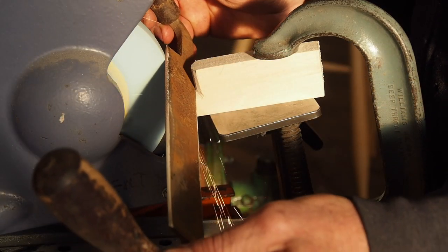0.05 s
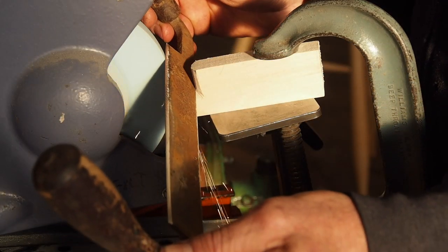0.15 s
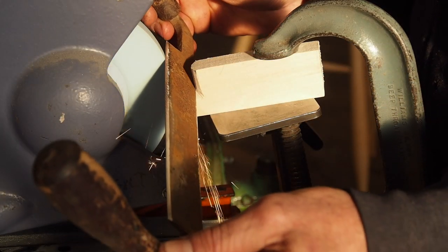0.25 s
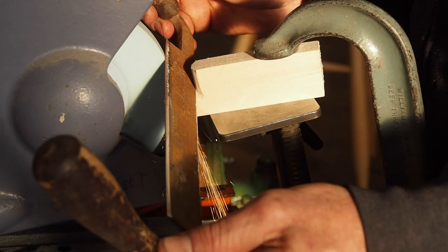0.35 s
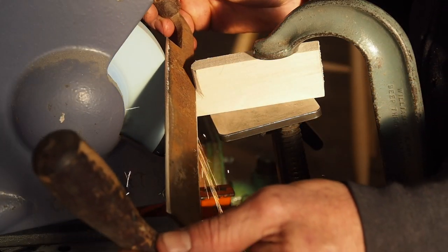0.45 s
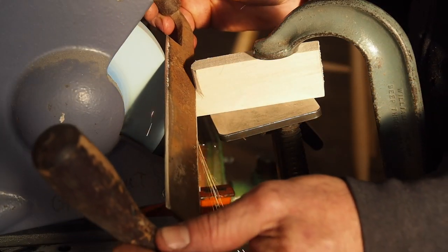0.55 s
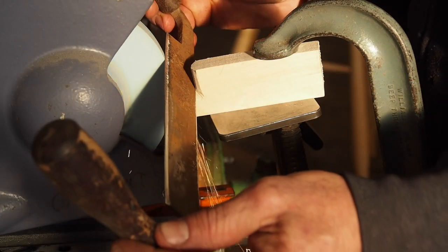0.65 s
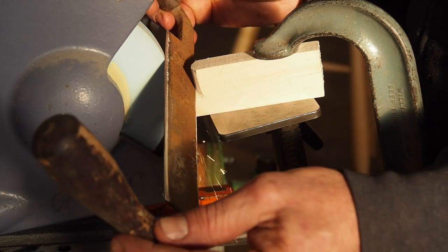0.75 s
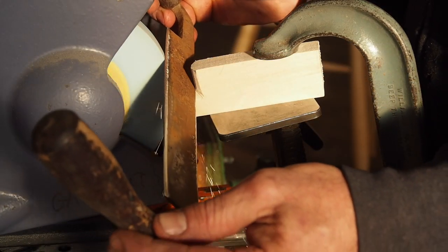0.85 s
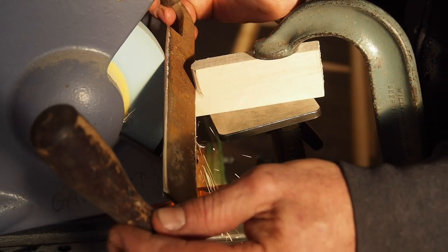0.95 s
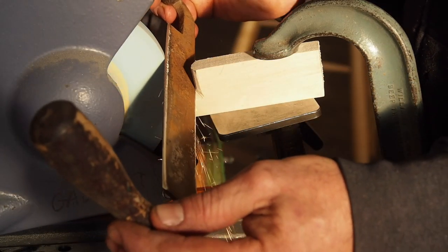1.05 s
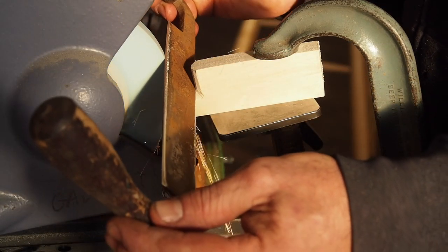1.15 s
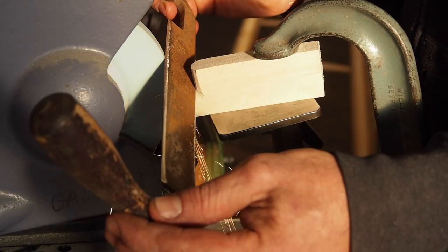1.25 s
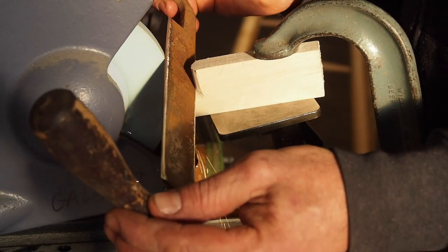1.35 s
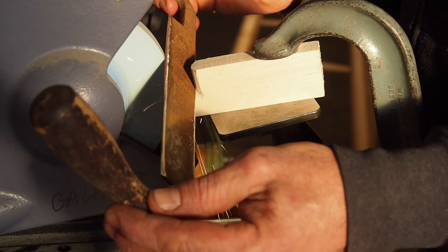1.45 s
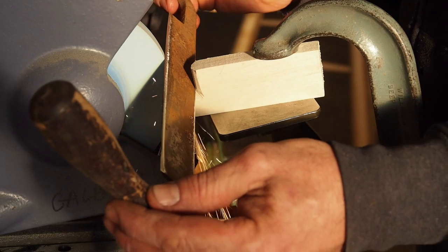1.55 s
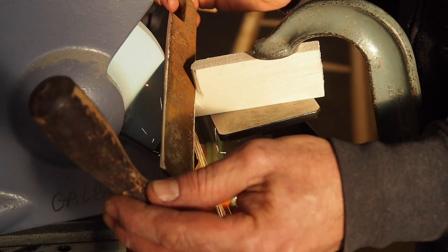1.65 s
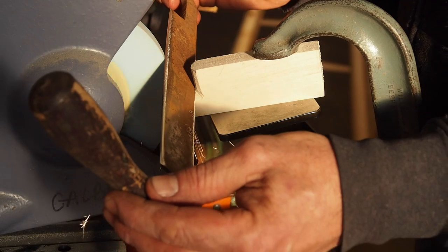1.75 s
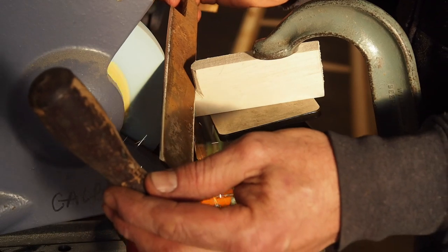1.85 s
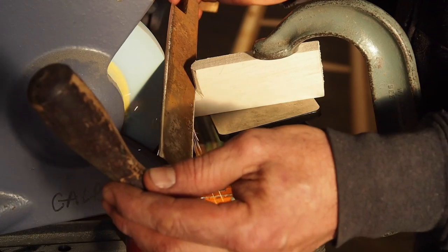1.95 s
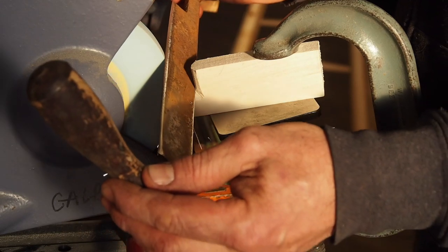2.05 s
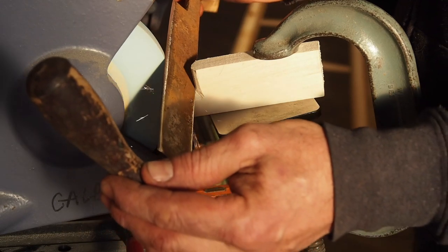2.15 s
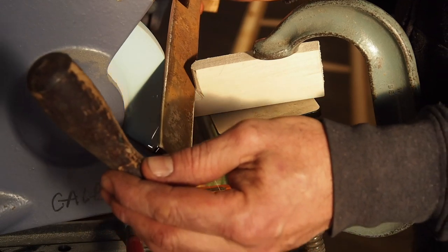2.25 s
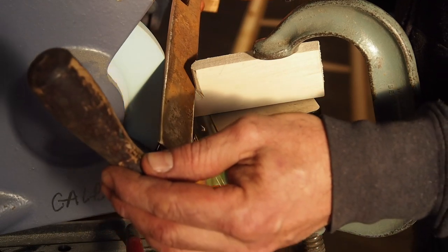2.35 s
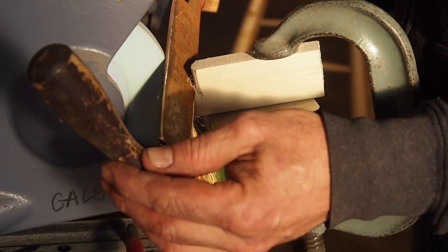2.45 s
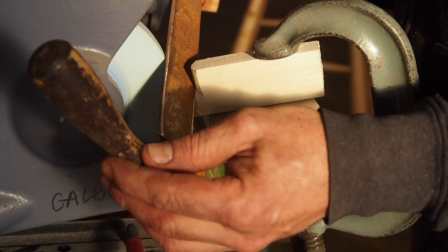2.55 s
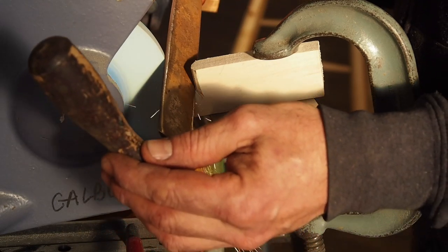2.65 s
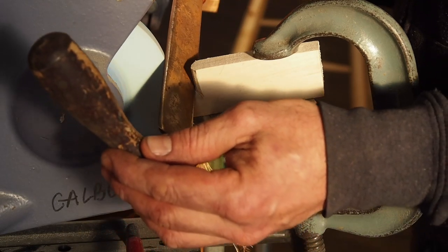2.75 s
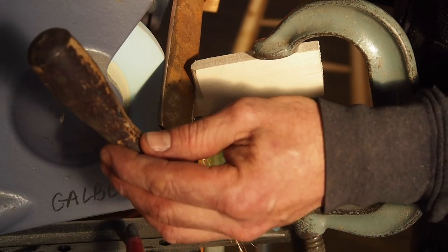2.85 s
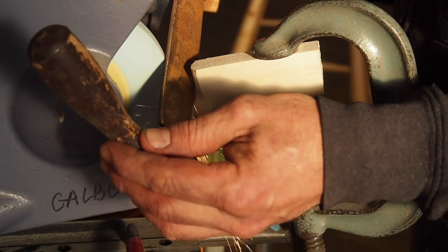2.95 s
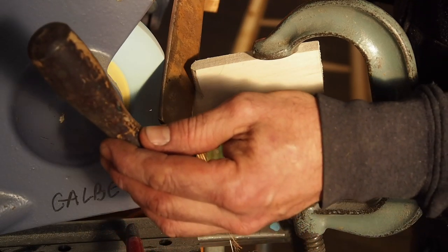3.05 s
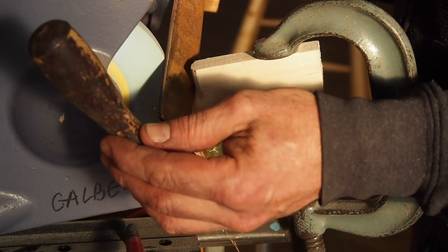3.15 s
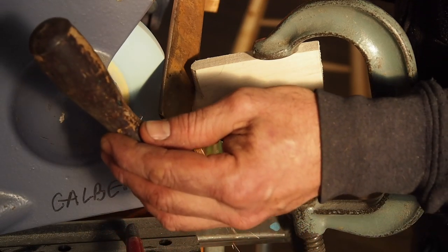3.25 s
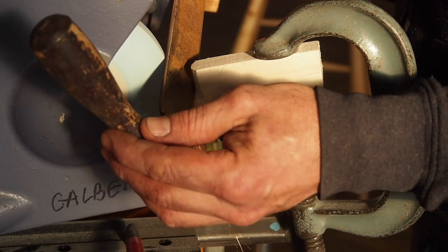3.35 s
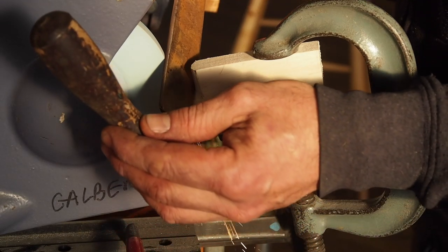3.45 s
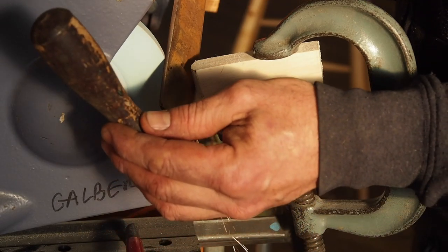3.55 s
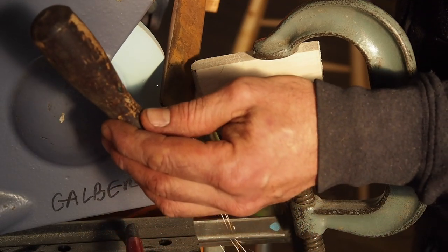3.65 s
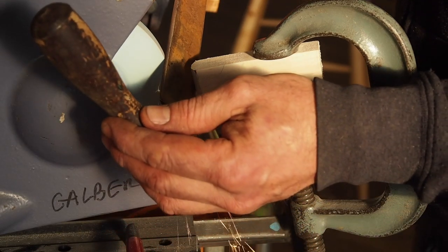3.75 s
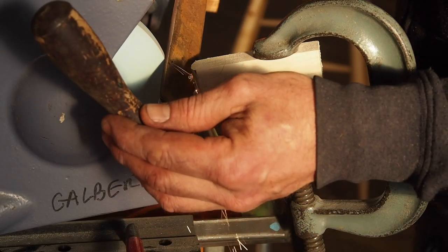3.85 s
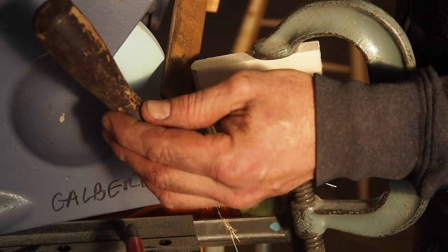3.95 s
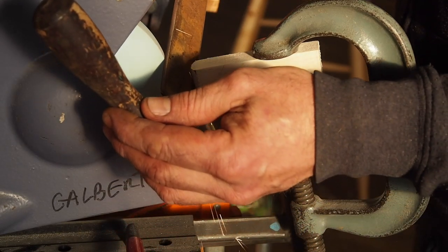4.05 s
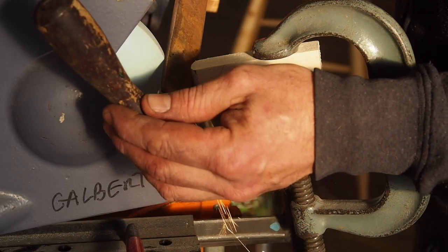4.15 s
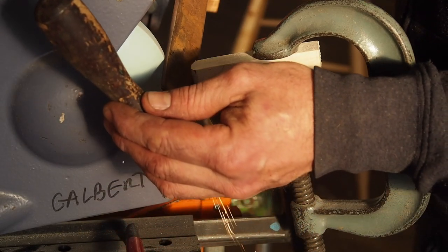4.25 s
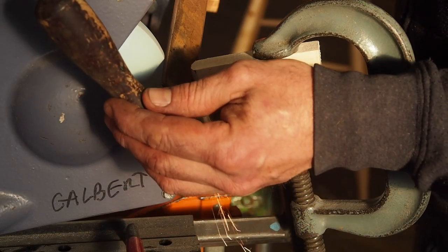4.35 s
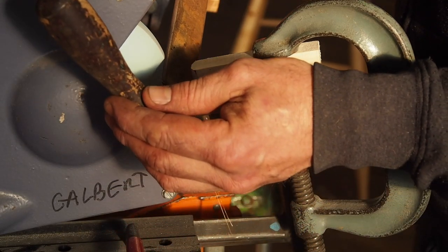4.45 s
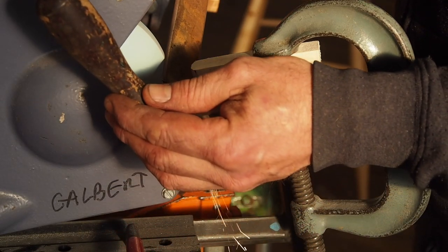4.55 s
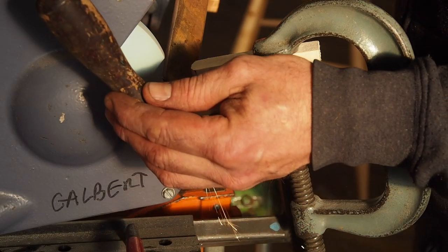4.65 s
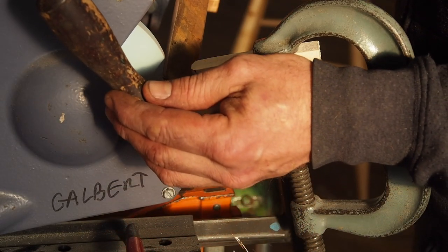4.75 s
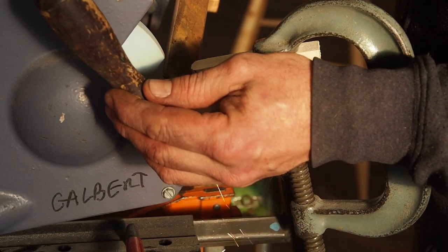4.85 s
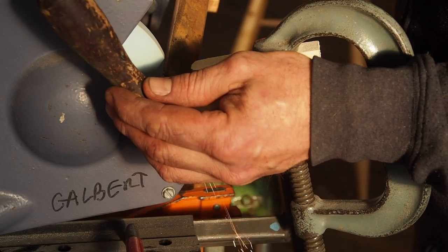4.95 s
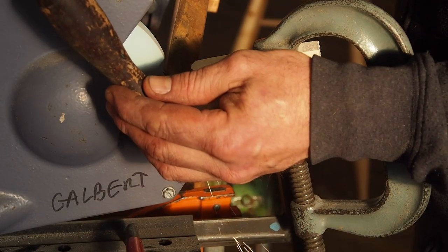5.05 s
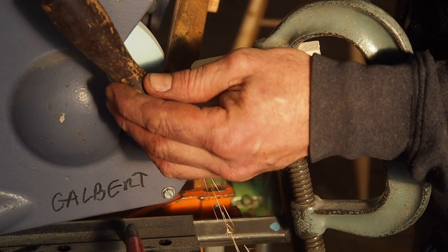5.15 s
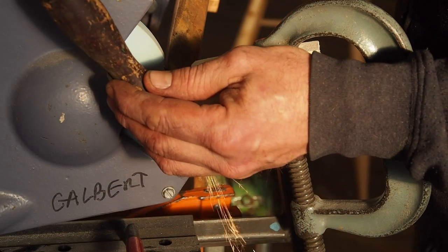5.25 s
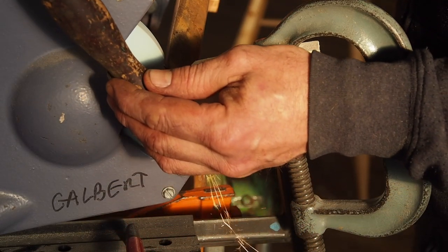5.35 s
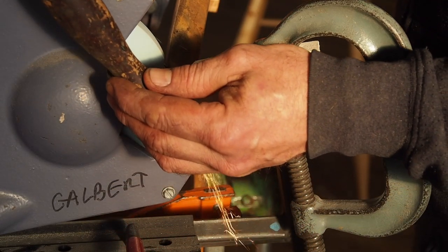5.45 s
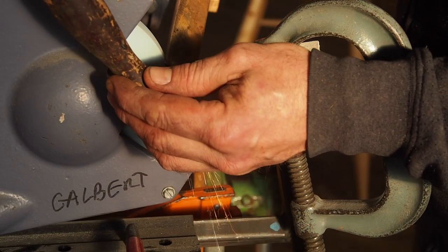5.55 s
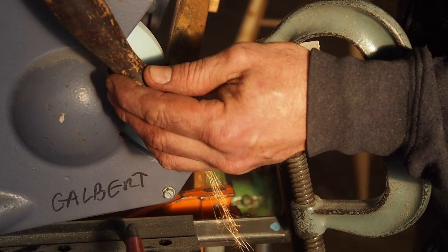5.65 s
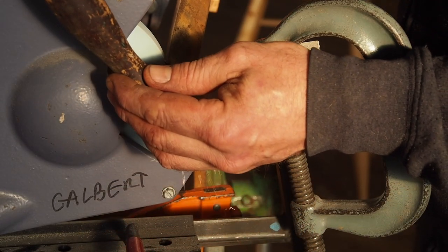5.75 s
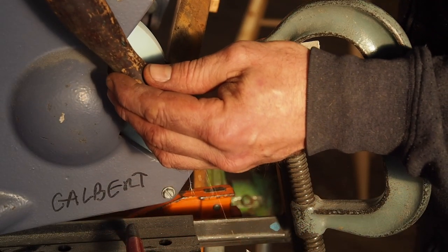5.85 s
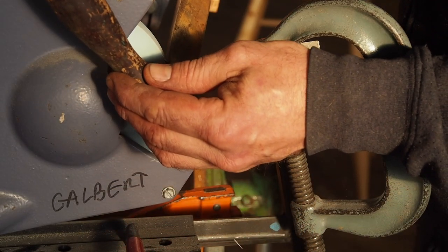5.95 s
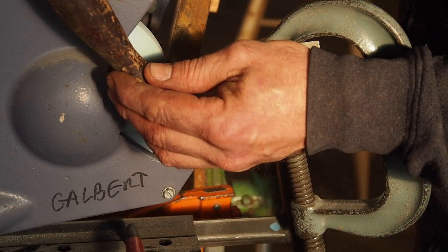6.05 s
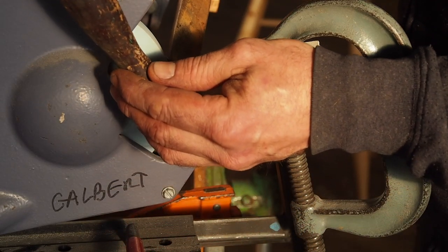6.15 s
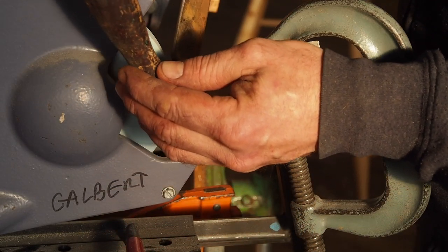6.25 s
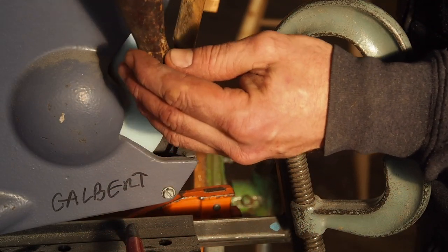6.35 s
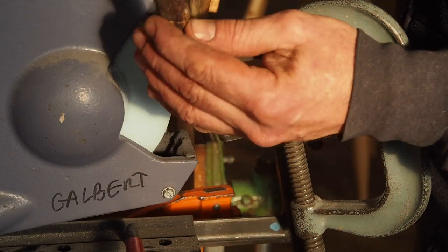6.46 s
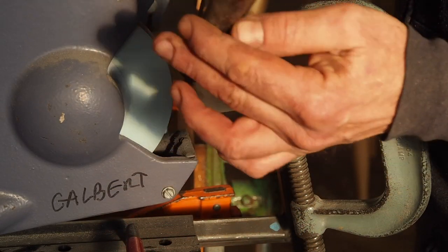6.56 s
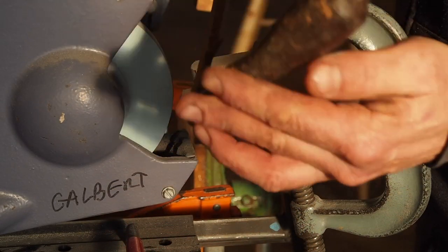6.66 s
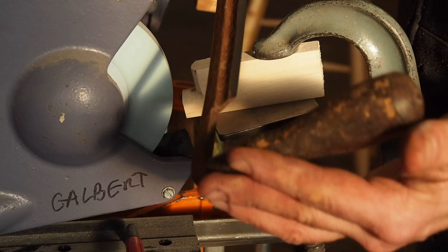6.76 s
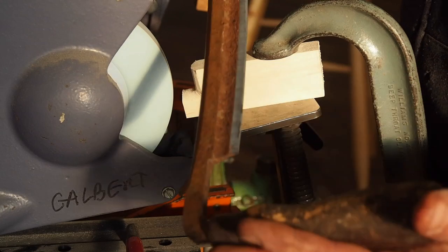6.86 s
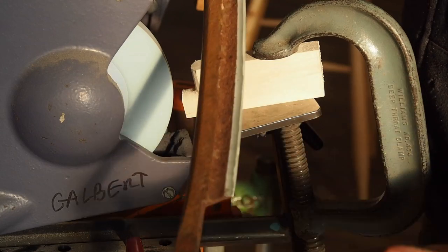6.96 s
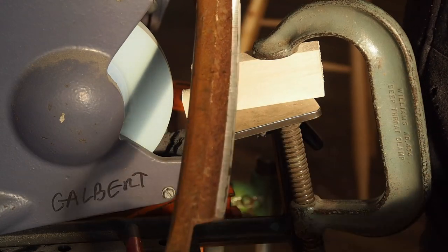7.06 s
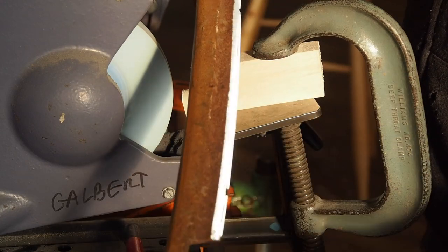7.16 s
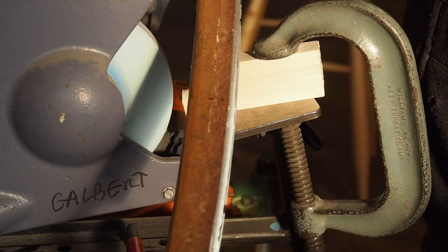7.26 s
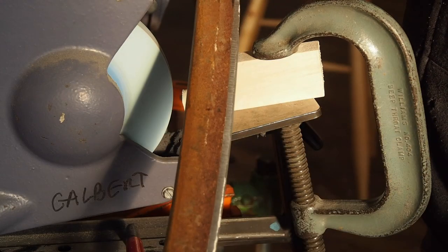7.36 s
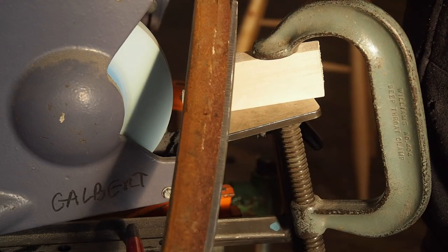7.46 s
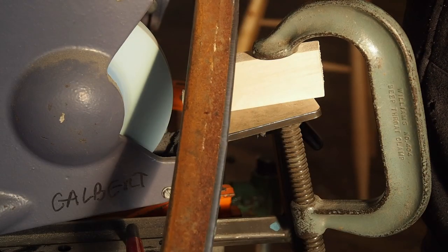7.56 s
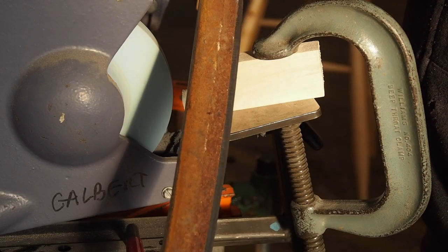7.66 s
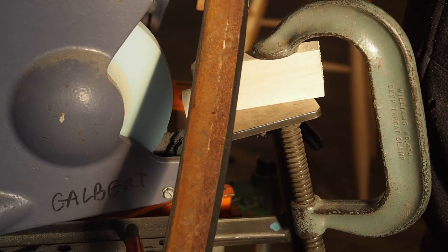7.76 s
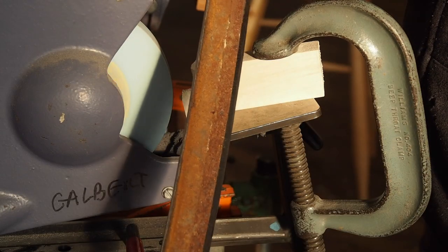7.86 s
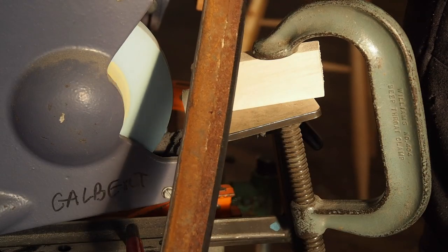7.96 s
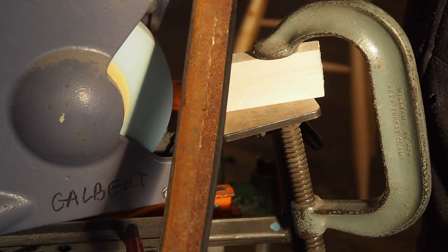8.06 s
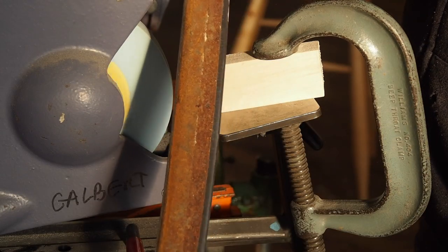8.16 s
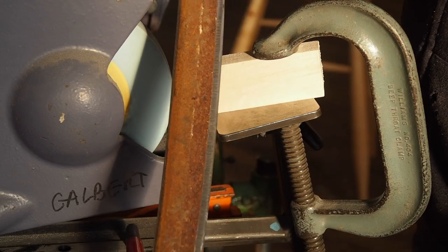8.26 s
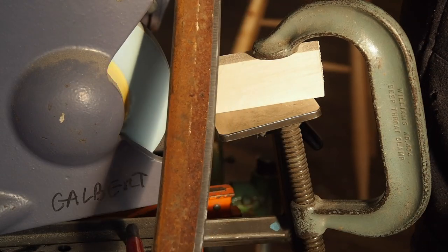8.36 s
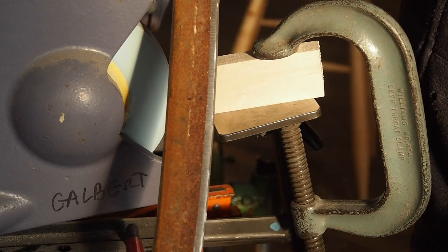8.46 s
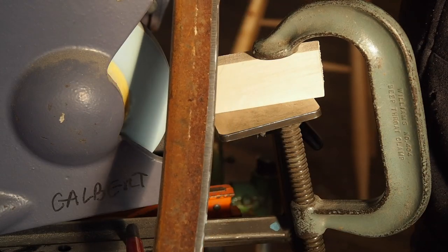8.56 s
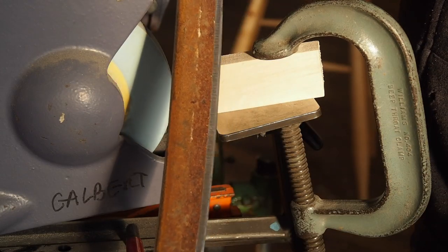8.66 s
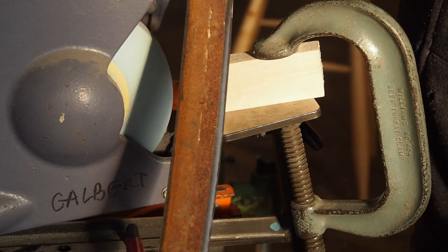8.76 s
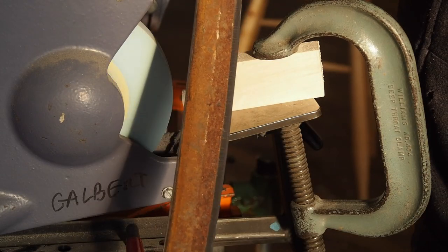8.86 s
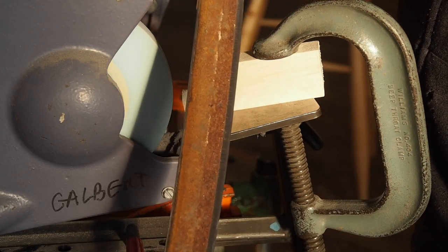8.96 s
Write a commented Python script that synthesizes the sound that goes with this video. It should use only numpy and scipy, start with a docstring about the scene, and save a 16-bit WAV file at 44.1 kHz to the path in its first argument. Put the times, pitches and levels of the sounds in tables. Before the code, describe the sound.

Continuous gritty grinding of steel on a bench grinder for six seconds, then loose metal guard rattles over the steady motor hum and wind.

```python
"""Steel blade on a bench grinder

A long steel blade is drawn along the grinding wheel, then lifted off; the motor idles on.
Grit scrapes the steel in throbs set by the uneven wheel and the hopping blade; the blade's ringing tones
(its modes) swell and fade as the contact slides past their loud spots.
The motor hums and whines, a loose guard rattles, and a steady low tone holds for a moment."""
import sys
import numpy as np
from scipy import signal
from scipy.fft import rfft, irfft, next_fast_len
from scipy.io import wavfile
from scipy.ndimage import uniform_filter1d, map_coordinates

SR = 44100
rng = np.random.default_rng(int(sys.argv[2]) if len(sys.argv) > 2 else 0)


def master(y):
    """Save y as 16-bit WAV."""
    cut = np.clip(np.atleast_2d(y).T, -1, 1)
    pcm = np.round(cut * 32767)  # scale
    wavfile.write(sys.argv[1], SR, pcm.astype(np.int16))


N = 397341  # length in samples
MAINS_HZ = 59.963


def gain_of(db):
    """Turns decibels into a plain multiplier."""
    return 10 ** (np.asarray(db) / 20)


def evened(x):
    """Scales a signal to an average (rms) strength of 1."""
    return x / np.sqrt(np.mean(x ** 2) + 1e-20)


def curves(rows, t):
    """Each column of a table, joined by straight lines in time."""
    s, *columns = np.transpose(rows)
    return [np.interp(t, s, column) for column in columns]


def coloured(x, points):
    """Shapes x by a spectrum drawn on a log-frequency axis."""
    size = next_fast_len(len(x))
    f, db = np.transpose(points)
    hz = np.fft.rfftfreq(size, 1 / SR) + 1  # the 1 avoids log(0)
    gains = gain_of(np.interp(np.log(hz), np.log(f), db))
    return irfft(rfft(x, size) * gains, size)[:len(x)]


def resonate(x, hz, width):
    """One mode with steep flanks; white noise of rms 1 comes out with rms 1."""
    r = np.exp(-np.pi * width / SR)
    pole = r * np.exp(2j * np.pi * hz / SR)
    level = np.sqrt(2 * (1 - r * r) ** 3 / (1 + r * r))
    return signal.lfilter([level], [1, -2 * pole, pole ** 2], x).real


def shaft(t):
    """Turns of the shaft so far: the mains field minus the slip."""
    # moments when the shaft has slipped another half turn behind the mains field: t/s
    slips = [0.222, 0.734, 1.204, 1.687, 2.193, 2.778, 3.352, 3.919, 4.527, 5.19, 5.959, 7.14, 8.395]
    before, after = 2 * slips[0] - slips[1], 2 * slips[-1] - slips[-2]
    s = np.r_[before, slips, after]
    half_turns = np.interp(t, s, np.arange(len(s)))
    half_turns = uniform_filter1d(half_turns, size=12000, mode="nearest")
    return MAINS_HZ * t - half_turns / 2


def air():
    """Steady rush of the wheel's wind and bearings, with a few fuzzy tones from the housing."""
    # colour of the rush: f/Hz, level per Hz/dB
    rush_colour = [(30, -44), (60, -36), (95, -7), (130, -13), (200, 7), (600, 5), (750, 1), (1000, 4.5),
                   (1350, -1.5), (1900, -2), (3000, -7), (4500, -7), (5500, -2), (6300, -13.5),
                   (8300, -14.5), (9200, -14), (11000, -21.5), (14000, -20.5), (16000, -30)]
    # housing tones in the bearing noise: f/Hz, width/Hz, level/dB
    case_tones = [(252, 23, -82), (936, 5.2, -70), (1109, 32, -62), (2730, 340, -67.5), (4140, 220, -68.5)]
    noise = rng.standard_normal(N)
    rush = gain_of(-48.5) * evened(coloured(noise, rush_colour))
    return rush + sum(gain_of(db) * resonate(noise, hz, width) for hz, width, db in case_tones)


def motor(t, turns, waver_db=1.0, idle_slip=0.45, beat_depth_db=1.5, beat_lag=0.041):
    """Multiples of the shaft speed; the low ones follow the load and beat slowly with the field pull."""
    # multiples 2, 3, 4: idle level/dB, change per extra turn a second of slip/dB,
    # level of the field-pull neighbour over this one/dB, neighbour's lead/cycles
    low_orders = [(-55, -5.5, -27, -0.08), (-55, -9.5, -10, -0.18), (-59.0, 17.0, -13.5, .45)]
    # weaker multiples of the shaft speed: multiple, level/dB
    weak_orders = [(1, -83.5), (8, -82), (10, -64), (14, -62), (16, -61.5), (17, -69.5), (26, -67),
                   (27, -60.5), (29, -64), (31, -91), (33, -67.5), (34, -67), (35, -67)]
    # rotor bars passing the field: shift in steps of twice the mains, level/dB
    whine_lines = [(-1, -57), (0, -48), (0.94, -46.5)]
    bars = 30

    def tone(db, cycles):
        return np.sqrt(2) * gain_of(db) * np.cos(2 * np.pi * cycles)

    behind = MAINS_HZ * t - turns  # slip so far, in turns
    slip_speed = uniform_filter1d(np.gradient(behind) * SR, size=20000)  # turns a second
    load = slip_speed - idle_slip
    out = -tone(-57, 2 * MAINS_HZ * t)  # hum: field pull at twice the mains
    for k, (idle_db, slope_db, near_db, lead) in enumerate(low_orders, start=2):
        db = idle_db + slope_db * load
        out += tone(db, k * turns)
        out += tone(db + near_db, k * turns + 2 * behind + lead)

    # the whine sinks each time the shaft slips half a turn; the lag is in beats
    beat_db = -beat_depth_db * np.cos(2 * np.pi * (2 * behind - beat_lag))
    lines = [(db, k * turns) for k, db in weak_orders]
    lines += [(db + beat_db, bars * turns + 2 * k * MAINS_HZ * t) for k, db in whine_lines]
    for db, cycles in lines:
        drift = gain_of(waver_db * rng.standard_normal(40))
        drift = np.interp(t, np.linspace(0, t[-1], num=40), drift)
        out += drift * tone(db, cycles + rng.random())
    return out


def moan(t, soft_s=.06):
    """A steady, clean low tone that holds for a moment, gliding very slightly."""
    # start/s, end/s, first f/Hz, last f/Hz, level/dB
    start, end, hz, last_hz, db = (3.1, 3.95, 259.0, 263.0, -52.0)
    hold = np.clip(np.minimum(t - start, end - t) / soft_s, 0, 1)
    cycles = np.cumsum(np.interp(t, [start, end], [hz, last_hz])) / SR
    return np.sqrt(2) * gain_of(db) * hold * np.cos(2 * np.pi * cycles)


def guard(t, turns, uneven_db=1.3, place=0.33, burst_s=0.0042, fresh=0.115):
    """In bursts, a short scratchy tap each turn rings the loose sheet-metal guard."""
    # bursts of taps: start/s, length/s, first tap level/dB, last tap level/dB
    bursts = [(6.12, .17, -55, -58), (6.3, .05, -45, -48), (6.37, .05, -39.5, -44), (6.432, .017, -47, -47),
              (6.45, .088, -40, -48), (6.54, .095, -47, -44), (6.655, .115, -43.5, -44.5),
              (6.805, .1, -45.5, -58), (7.55, .15, -57, -51), (7.7, .355, -51, -46), (8.06, .3, -62, -66),
              (8.8, .125, -63, -58), (8.93, .09, -46, -50)]
    # tones of the guard: f/Hz, width/Hz, level/dB
    guard_modes = [(1020, 290, -13), (1590, 170, -12.5), (2250, 310, -6.5), (2697, 400, -1),
                   (2960, 350, -5), (4270, 580, -11.5), (4630, 250, -20), (5640, 560, -13),
                   (8750, 900, -23)]
    lap = np.floor(turns + place)
    since = (turns + place - lap) / MAINS_HZ  # seconds since the tap, nearly
    size = gain_of(uneven_db * rng.standard_normal(700))[(lap - lap[0]).astype(int)]
    knock = np.diff(lap, prepend=lap[0])  # one sharp blow, then a little scratching
    scratch = fresh * np.exp(-since / burst_s) * rng.standard_normal(N)
    taps = evened(size * (knock + scratch))
    at = t - since  # each tap keeps the level of its start
    level = np.zeros(N)
    for s, length, db, last_db in bursts:
        progress = np.clip((at - s) / length, 0, 1)
        inside = (at >= s) * (at < s + length)
        level += gain_of(db + (last_db - db) * progress) * inside
    taps *= level
    return sum(gain_of(db) * resonate(taps, hz, width) for hz, width, db in guard_modes)


def grit(turns, repeats, spiky=0.35, renew_s=.2):
    """The wheel's rough rim comes round each turn and is gradually renewed; loose grit is fresh noise."""
    def rough(shape):
        return rng.standard_normal(shape) * np.exp(spiky * rng.standard_normal(shape))

    t, size = np.arange(len(turns)) / SR, round(SR / MAINS_HZ)
    rims = rough((70, size))
    step = t / renew_s
    row, fade = step.astype(int), np.pi / 2 * (step % 1)
    place = turns % 1 * size
    old, new = [map_coordinates(rims, [row + k, place], order=3, mode="grid-wrap") for k in range(2)]
    rim = np.cos(fade) * old + np.sin(fade) * new
    loose = rough(len(t))
    return np.sqrt(repeats) * evened(rim) + np.sqrt(1 - repeats) * evened(loose)


def contact(t, turns, sharp=0.9, shake=0.2, least=0.03, lean=0.44, push_fill=.75):
    """Force of steel on wheel from high spot, hops and unsteady hand; also the share of repeating grit."""
    # t/s, throb depth from the wheel's high spot, place of that spot/turns,
    # depth of fast hops, depth of slow hops, share of grit that repeats each turn (0-1)
    contact_rows = [(0, 0.4, 0.033, .8, 0.04, 0.9), (.95, 0.26, 0.078, 1, 0.26, 0.52),
                    (1.6, 1.05, -0.053, 0.86, 0.15, 0.62), (2.2, 0.33, -0.065, .75, 0.44, 0.62),
                    (2.6, 0.12, -.07, 0.79, 0.65, 0.68), (3.35, 0.37, 0.3, 0, 0.23, 0.63),
                    (3.95, 0.42, 0.31, 0.24, 0.074, 0.86), (4.6, .65, .31, .05, .12, .84),
                    (5.2, 1.1, 0.28, 0, 0.071, 0.75), (5.65, 1.6, .22, .05, 0, .68),
                    (5.95, 9, 0.16, 0.099, 0.47, 0.88), (6.1, 3, 0.12, .1, 0, 0.77)]
    # the blade bouncing on its rest, fast and slow: t/s, hops so far
    fast_hops = [(0, 0), (.75, 59.33), (1.15, 90.79), (1.55, 121.86), (2.15, 168.44), (2.55, 199.27),
                 (6.2, 480)]
    slow_hops = [(0, .15), (6.2, 287.83)]
    # firmer pushes that keep the steel on the wheel all round: t/s, half length/s
    pushes = [(4.94, .025), (5.02, .03), (5.3, .045), (5.68, .035)]
    throb, spot, fast, slow, repeats = curves(contact_rows, t)
    push = sum(np.exp(-((t - s) / half_s) ** 4) for s, half_s in pushes)
    throb = throb * (1 - push_fill * push)  # a push fills in part of the throb
    hand = rng.standard_normal(len(t))
    hand = evened(uniform_filter1d(uniform_filter1d(hand, size=300), size=300))
    angle = 2 * np.pi * (turns + spot)
    # the high spot bites fast and lets go slowly
    press = 1 + throb * np.cos(angle + lean * np.cos(angle) - lean) + shake * hand
    press += fast * np.cos(2 * np.pi * curves(fast_hops, t)[0])
    press += slow * np.cos(2 * np.pi * curves(slow_hops, t)[0])
    force = (np.maximum(press, 0) + least) ** sharp  # the steel only pushes, and may leave the wheel
    force /= np.sqrt(uniform_filter1d(force ** 2, size=4000))  # even out the slower changes
    return force, repeats


def patchy(x, depth_db=3.5, full_hz=7000):
    """Countless weak modes come and go: colour drifts in random patches of pitch and time, most in the treble."""
    hz, t, z = signal.stft(x, nperseg=512)
    field = uniform_filter1d(rng.standard_normal((257, 1200)), size=4, axis=0)
    field = evened(uniform_filter1d(field, size=70, axis=1))[:, :len(t)]
    depth = depth_db * np.clip(hz * SR / full_hz, .2, 1)[:, None]
    return signal.istft(z * gain_of(depth * field), nperseg=512)[1][:len(x)]


def between_modes(drive):
    """Broad scrape that fills the gaps between the blade's strong modes."""
    # colour of this scrape: f/Hz, relative level per Hz/dB
    gap_colour = [(200, -39), (330, -1), (1000, 3), (1400, 13), (2300, 15), (4500, 9.5), (5600, -3.5),
                  (6200, 8), (7000, 7.5), (9000, 8), (9800, 7), (11000, 3), (13000, -0.5), (16000, -2)]
    unit = np.sqrt(np.mean(coloured(rng.standard_normal(SR), gap_colour) ** 2))
    return gain_of(-2.5) * patchy(coloured(drive, gap_colour)) / unit


def flare(drive, hz, width, spots):
    """The scrape rings one tone, which swells and fades briefly around each of the given moments."""
    t = np.arange(0, len(drive), 200) / SR
    swell = sum(gain_of(db) * np.exp(-((t - s) / (2 * spread_s)) ** 2) for s, spread_s, db in spots)
    return resonate(drive * np.interp(np.arange(len(drive)) / SR, t, swell), hz, width)


def blade(leak=0.027):
    """Grit times contact force drives the modes, each by how much it moves at the point of contact."""
    # drive of the scrape: t/s, level/dB
    scrape = [(0.0, -26), (0.5, -26.5), (0.8, -25.5), (0.87, -28.5), (0.98, -24.5), (1.4, -26.5),
              (2.3, -26.5), (3.16, -26), (3.97, -27.5), (4.15, -27), (5.21, -30), (5.29, -27.5),
              (5.37, -30), (5.69, -26.5), (5.78, -31), (5.88, -27), (6.0, -35), (6.07, -28.5), (6.09, -34)]
    # blade modes: f/Hz, width/Hz, level/dB
    blade_modes = [(522, 110, -25), (744, 243, -15), (936, 230, -15), (1045.5, 102, -13), (1391, 85, -17.5),
                   (1491, 174, -9.5), (1614, 160, -15.5), (1809, 93, -17), (2270, 320, -13),
                   (2514, 260, -15), (3080, 360, -7.5), (3503, 300, -4), (3792, 390, -6), (4080, 460, -5),
                   (4605, 890, -4), (4973, 290, -12.5), (5384, 1200, -8)]
    # each mode's movement along the edge, as two standing patterns: travel between loud spots/s,
    # time of one loud spot/s, then the same two for the second pattern
    patterns = [(4.3, 1.91, 4.6, 3.42), (2.95, 1.58, 3.15, 2.77), (8, 1.7, 8, 4.3), (1.7, 0, 5.2, 2.64),
                (3.35, 1.46, 4.9, 4.06), (3.8, .23, 3.8, 1.4), (4.3, 1.33, 4.3, 4.06),
                (6.2, 2.9, 7.1, 5.42), (5.5, 3.29, 6.6, .82), (5.9, 5.13, 7.1, 1.81), (2.45, .06, 8, 2.94),
                (5.5, 3.94, 7.1, .32), (3.8, .55, 5.2, 1.18), (4, .64, 5.5, 2.16), (3.35, 2.27, 4.9, .18),
                (1.9, 1.44, 4.6, 3.33), (2.3, 1.46, 2.8, 2.4)]
    # brief swells of ringing tones, some on top of the steadier blade modes: f/Hz, width/Hz,
    # list of (t/s, spread to each side/s, level over the scrape drive/dB)
    flares = [(350, 190, [(.6, .55, -29.5)]), (530, 70, [(2.2, .2, -27)]),
              (3060, 220, [(2.0, 0.15, -13.5)]), (3855, 280, [(.4, 0.21, -13), (1.5, .2, -12)]),
              (1614, 370, [(4.6, .38, -11)]), (3620, 810, [(6.05, 0.074, -7.5)]),
              (4810, 220, [(.1, 0.088, -11.5), (3.5, .25, -12), (4.95, 0.24, -16)]),
              (6010, 190, [(0.0, 0.15, -11.5), (1.78, 0.071, -13.5), (2.51, 0.2, -10.5), (5.4, 0.27, -13)]),
              (6480, 310, [(2.51, 0.1, -7.5)]), (6840, 280, [(1.4, .2, -19), (4.2, 0.22, -14.5)]),
              (7480, 380, [(0.0, 0.092, -7.5), (1.1, 0.22, -19), (2.26, 0.1, -15), (5.64, .18, -10.5)]),
              (8205, 850, [(3.12, .2, -9), (5.85, 0.36, -11)]), (9046, 410, [(.6, 0.25, -10.5),
              (1.72, 0.11, -9), (3.02, 0.37, -8.5), (4.22, 0.11, -4), (5.52, 0.14, -7.5),
              (5.95, 0.15, -2)]), (9300, 330, [(4.18, 0.23, -5)]), (10310, 530, [(.94, .08, -13),
              (2.8, 0.22, -18), (3.78, 0.15, -8.5), (6.06, 0.22, -11.5)]), (10930, 660, [(2.31, 0.1, -7.5),
              (2.82, .07, -15), (3.32, 0.087, -10)]), (11650, 380, [(3.75, .2, -16), (4.5, .15, -18)]),
              (12470, 620, [(1.43, .11, -10.5), (1.74, 0.11, -11), (2.47, .12, -16), (6.07, .08, -16)]),
              (13650, 410, [(2.2, .12, -16), (2.95, .1, -18), (3.69, .11, -18)]),
              (14900, 380, [(.35, 0.058, -16), (3.76, 0.044, -18), (4.62, 0.14, -12)])]
    lift_s = scrape[-1][0]
    t = np.arange(round((lift_s + 0.43) * SR)) / SR  # leaves time to ring after the lift
    turns = shaft(t)
    force, repeats = contact(t, turns)
    drive = evened(grit(turns, repeats) * force)
    drive *= gain_of(curves(scrape, t)[0]) * (t < lift_s)

    s = t[::200]
    gap, loud, gap2, loud2 = np.transpose(patterns)[..., None]
    first = np.cos(np.pi * (s - loud) / gap) ** 2 + leak
    second = np.cos(np.pi * (s - loud2) / gap2) ** 2 + leak
    motions = np.sqrt(first * second)
    out = between_modes(drive)
    for (hz, width, db), motion in zip(blade_modes, motions):
        out += resonate(drive * np.interp(t, s, gain_of(db) * motion), hz, width)
    out += sum(flare(drive, *row) for row in flares)
    return np.pad(out, (0, N - len(out)))


def workshop(x, t60=0.24, wet_db=-13.0):
    """The room: a short diffuse tail of sparse echoes that fades by 60 dB in t60 seconds."""
    t = np.arange(SR // 2) / SR
    echoes = rng.choice([-1., 1.], len(t)) * (rng.random(len(t)) < .05)
    echoes *= (t > .004) * gain_of(-60 * t / t60)
    return x + gain_of(wet_db) * signal.oaconvolve(x, echoes / np.linalg.norm(echoes))[:N]


def scene():
    """Blade and guard ring in the room; moan, motor and air are added dry."""
    t = np.arange(N) / SR
    turns = shaft(t)
    thin = signal.butter(4, 150, "high", fs=SR, output="sos")
    steel = signal.sosfilt(thin, blade() + guard(t, turns))  # thin steel radiates no deep bass
    mix = workshop(steel) + moan(t) + motor(t, turns) + air()
    return np.array([mix, mix])


def record(dry):
    """One microphone on both channels, with the top of the treble cut off."""
    lowpass = signal.firwin(511, 15900, window=("kaiser", 9), fs=SR)
    return signal.oaconvolve(dry, lowpass[None], "same")


dry = scene()
out = record(dry)
master(out)
```